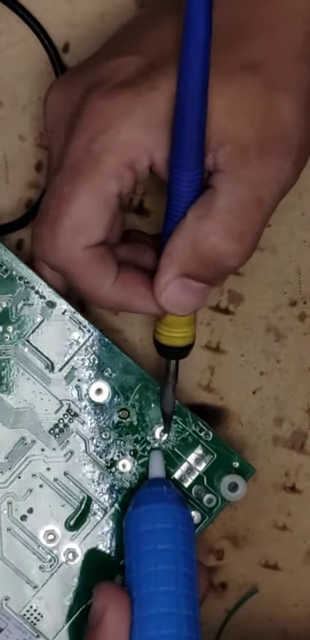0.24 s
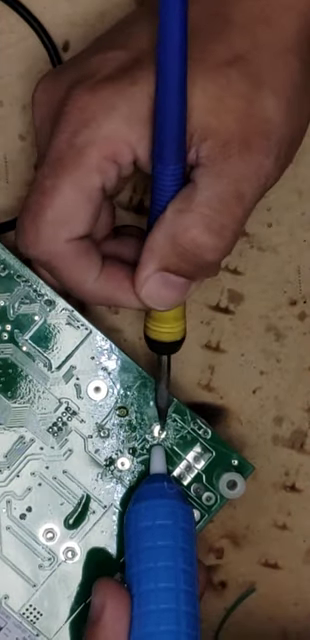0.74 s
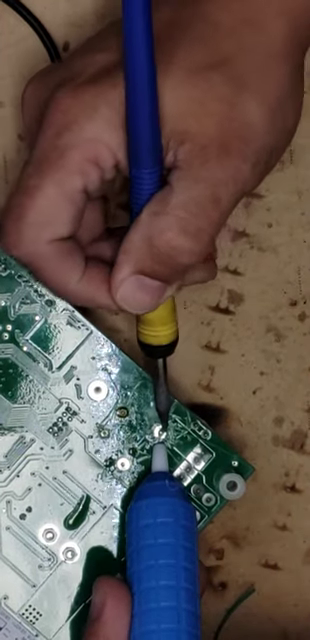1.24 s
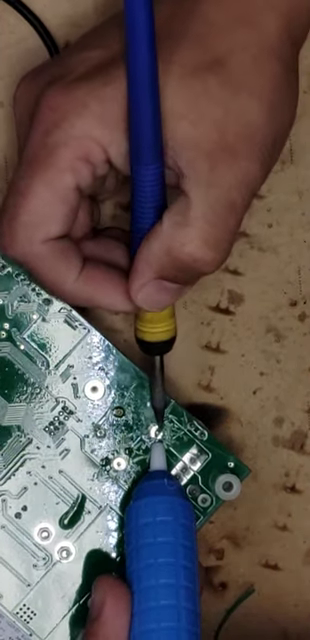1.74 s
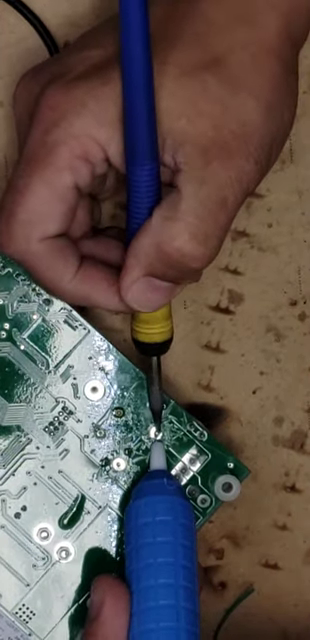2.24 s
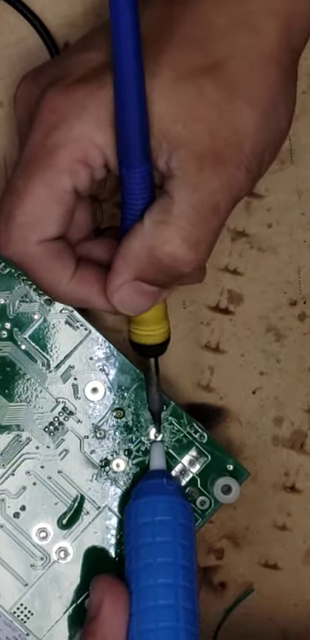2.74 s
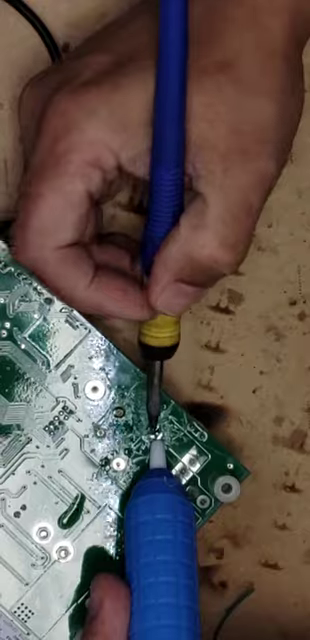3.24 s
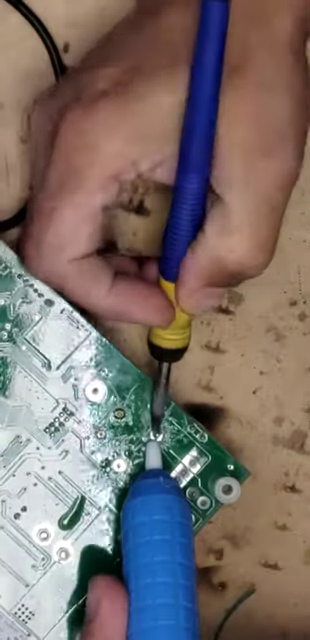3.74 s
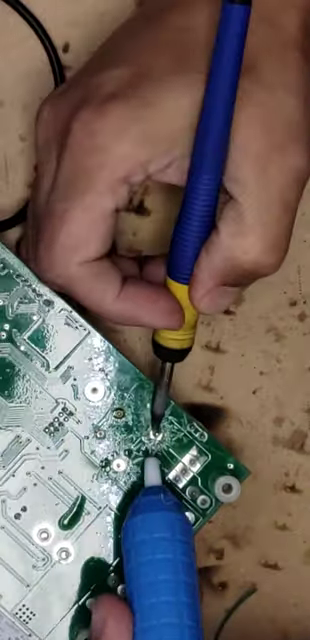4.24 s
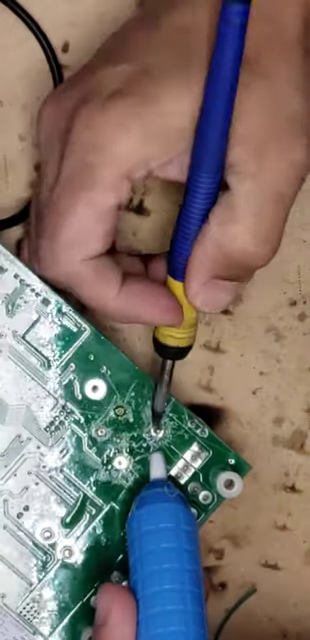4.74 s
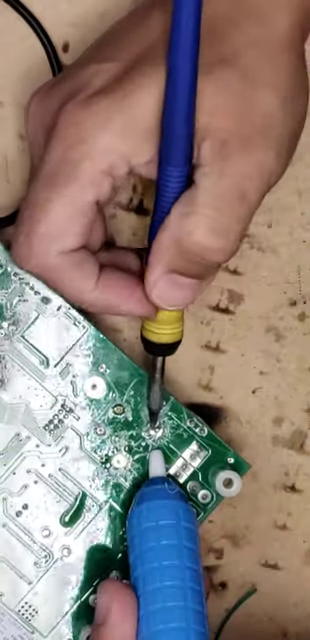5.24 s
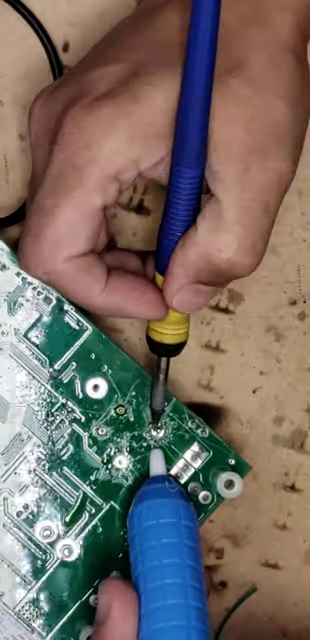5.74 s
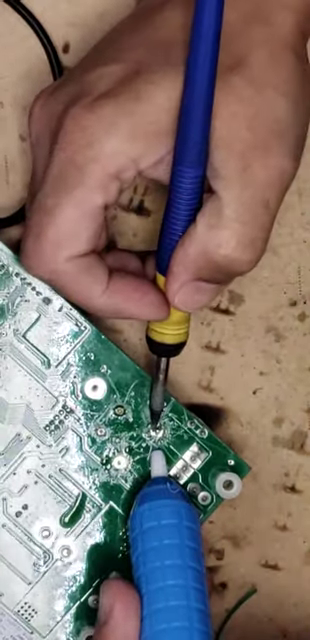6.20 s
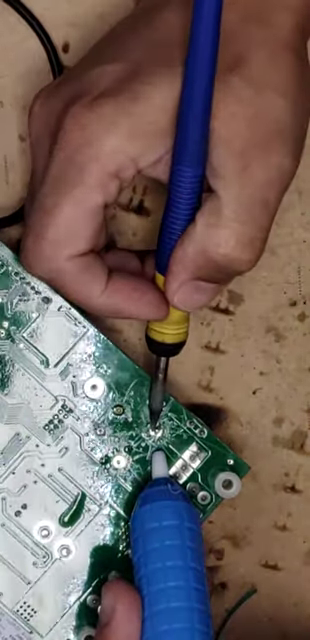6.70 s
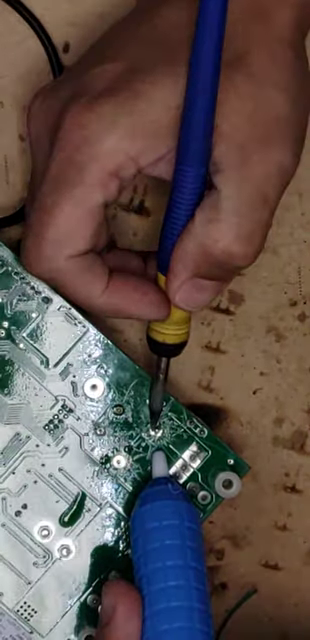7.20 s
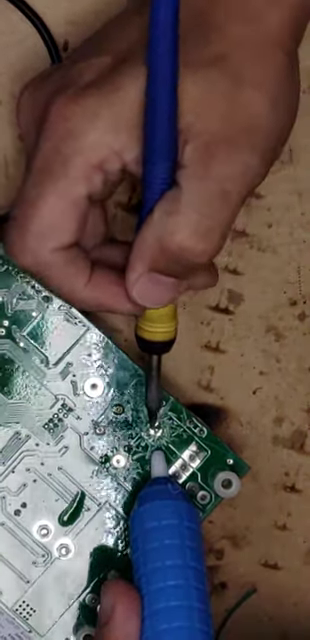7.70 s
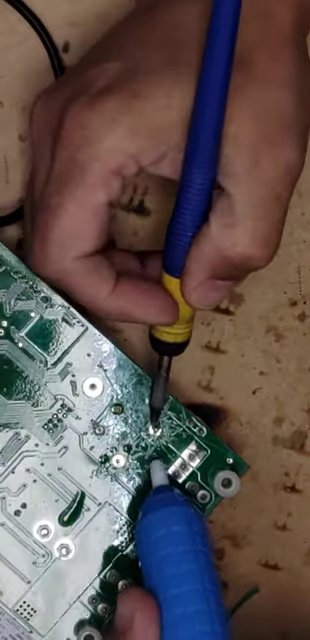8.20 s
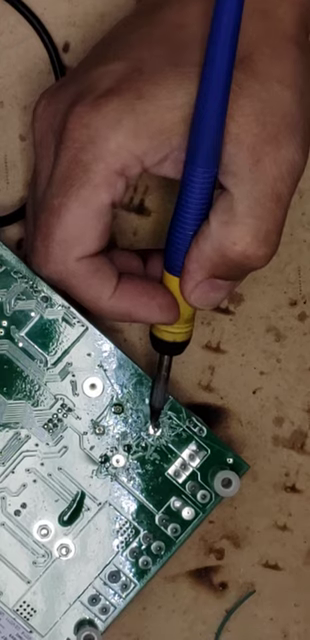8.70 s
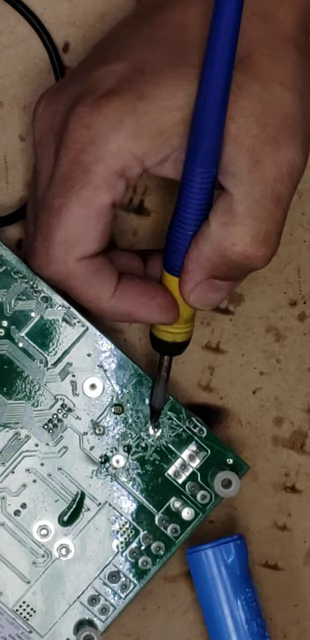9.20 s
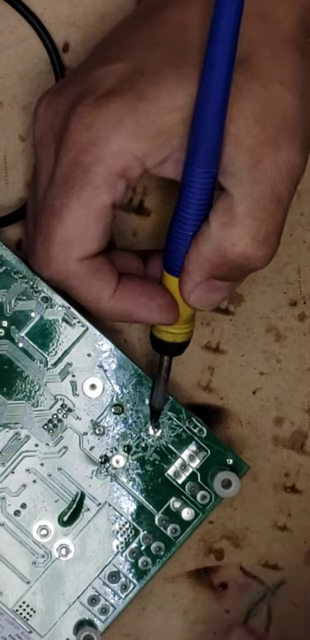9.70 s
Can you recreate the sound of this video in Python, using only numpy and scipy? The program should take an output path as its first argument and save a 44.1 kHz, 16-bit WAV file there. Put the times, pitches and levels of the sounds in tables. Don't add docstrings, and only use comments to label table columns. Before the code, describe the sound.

Steady low mains hum with airy hiss, tiny ticks and hand rustles; it cuts out abruptly, followed by scraping, clicking plastic and quiet room rumble.

```python
import sys
import numpy as np
from scipy import signal
from scipy.fft import rfft, irfft, next_fast_len
from scipy.io import wavfile

SR = 44100
rng = np.random.default_rng(int(sys.argv[2]) if len(sys.argv) > 2 else 0)


def to_wav(sig):
    pcm = np.clip(np.atleast_2d(sig), -1, 1) * 32767
    pcm = np.round(pcm).astype(np.int16)
    wavfile.write(sys.argv[1], SR, pcm.T)


def magnitude_from_level(level_db):
    exponent = np.asarray(level_db, float) / 20
    return 10 ** exponent


N = 438794

# start_s, mains_hz
MAINS = [(0, 59.995), (4, 60.0), (9.95, 60.014)]
# multiple, left_db, right_db, left_lead_rad
PUMP_PARTIALS = [(1, -53.3, -49.7, -.7), (2, -54.6, -53.2, .3),
                 (3, -50.4, -53.3, -0.1), (4, -42.0, -42.5, 0.1), (5, -59.1, -63.3, 0.1),
             (6, -63.4, -71.6, -0.4), (7, -70.7, -79.7, 0.7), (8, -75.9, -67.4, 0.1),
             (9, -67.5, -69.3, 1.0), (10, -76.9, -72.8, 0.2), (11, -68.3, -75.9, -0.9),
             (12, -81.6, -73.3, -2.4), (13, -63.2, -68.1, -0.2), (14, -67.3, -68.9, -1.9),
             (15, -56.6, -64.8, 0.0), (16, -62.8, -67.3, -0.3), (17, -62.8, -76.2, -1.2),
             (18, -68.7, -88.3, -1.4), (20, -73.0, -83.5, 1.4), (21, -77.7, -83.8, -1.0),
             (23, -73.9, -86.4, -2.7), (27, -76.2, -81.1, -1.1), (29, -74.8, -86.9, 0.8),
             (30, -67.9, -91.8, -0.6), (31, -71.1, -90.5, -2.6)]
# multiple, left_db, right_db
MOTOR = [(1, -49.3, -50.3), (2, -54.9, -54.3)]
MOTOR_SLIP_HZ, MOTOR_IN_STEP_S = 0.16, (3.25, 2.93)
OFF_S = 8.755
# pitch_hz, level_db
PANELS = [(430, -74), (545, -74), (665, -69)]
# frequency_hz, level_db (per Hz)
AIR_SPECTRUM = [(120, -46.5), (200, 3), (400, -4.5), (900, -2.5), (1400, -3), (2100, -3.5), (2350, -7.5),
                (3000, -5), (5500, -9), (7000, -16), (8100, -38), (9800, -41), (11500, -29.5), (15800, -26)]
# centre_hz, width_hz, left_db, right_db (negative values are dips)
CASING = [(1227, 62, 2.5, 8), (2030, 91, 4.5, 6), (2673, 70, 8.5, 4), (3207, 110, 6, -2.5),
          (3760, 550, -1, -0.5), (3946, 90, 4.5, 5.5), (3840, 190, -2.5, 3.5), (4400, 74, 4, -2.5),
          (4520, 490, -6, -0.5), (4530, 100, 7, 5.5), (5220, 180, -1, 13.5), (5320, 140, 3.5, -1),
          (6180, 160, 2.5, -5), (6580, 120, 5, -8), (7720, 990, 5.5, -10.5)]

# start_s, length_s, body_db, slide_above_body_db
STROKES = [
    (8.95, 0.056, -54.5, -5.5),
    (9.18, .015, -67, -7),
    (9.195, 0.07, -62.5, -11),
    (9.262, 0.068, -62, -9),
    (9.311, .018, -61, 5),
    (9.335, 0.023, -61.5, 3),
    (9.376, 0.042, -65, -10),
    (9.502, 0.02, -67, -8),
    (9.541, 0.016, -71, -8),
    (9.913, .06, -80, -8),
]
STROKE_RISE_S, STROKE_SAG_DB_PER_S, STROKE_T60_S = 0.0084, 74, 0.076
# start_s, length_s, treble_db, slide_above_treble_db
RUSTLE = [(3.877, 0.15, -63.5, -1), (4.463, .075, -73, -8), (4.529, .006, -73, -5), (5.676, .012, -68, -1),
          (6.3, 0.068, -85, 18), (8.47, 0.14, -76.5, 9), (8.604, 0.045, -67, 4.5), (8.665, .05, -74.5, 13),
          (8.74, .015, -65, 4), (9.194, 0.095, -64.5, -5.5), (9.31, .015, -65, -5), (9.797, .008, -83, -8)]
RUSTLE_RISE_SHARE, RUSTLE_SAG_DB_PER_S, RUSTLE_T60_S = 0.31, 16, 0.16
# frequency_hz, level_db (per Hz)
BODY_SPECTRUM = [(520, -21), (720, -2), (1000, -4), (1500, 1.5), (2000, -6), (2500, -2), (2900, -7),
                 (5000, -32)]
SLIDE_SPECTRUM = [(2000, -7), (3200, -0.5), (5000, 0), (7200, -4.5), (8200, -22), (9500, -42)]
RUSTLE_SPECTRUM = [(5000, -30.5), (8000, -13.5), (9500, -7.5), (11500, -0.5), (15800, -0.5)]
# start_s, peak_db, tone_centre_hz, chatter_s
HITS = [(8.957, -41.5, 950, .012), (8.959, -50, 2350, 0.018), (8.968, -42, 2350, .02),
        (8.975, -55, 1600, .03), (9.0, -54, 1900, .012), (9.180, -62, 1430, 0.023),
        (9.203, -49, 895, 0.019), (9.229, -54, 1490, 0.0063), (9.241, -51, 1300, 0.008),
        (9.268, -48.5, 1800, 0.0057), (9.276, -54, 2500, 0.0054), (9.322, -56, 3300, .008),
        (9.337, -40, 3900, 0.0021), (9.351, -44, 2400, .0025), (9.382, -48, 1480, .04),
        (9.518, -55, 2400, 0.025), (9.54, -58, 1450, 0.0055), (9.72, -76, 6600, .05),
        (9.797, -60, 7050, .028), (9.826, -71, 6900, .04), (9.889, -72, 5800, .03), (9.91, -71, 6800, .05),
        (9.916, -66, 1500, .02), (9.935, -60, 2600, .03)]
# pitch_hz, level_db, t60_s
BARREL_MODES = [(760, -2.5, 0.013), (960, -4, 0.043), (1334, -10, 0.032), (1430, -3, 0.044),
                (1650, 0, 0.048), (1900, -2.5, .025), (2230, -18, 0.023), (2424, -3.5, 0.019),
                (3170, -1, 0.018), (3440, 3, .015), (3880, -5, .015), (4520, 2, 0.018), (5270, 2, 0.012),
                (5360, -11, .015), (6240, 2, 0.022), (6800, -2.5, .015), (7500, -0.5, 0.0085)]
SPREAD_OCTAVE_S = 0.005
SPRING_HZ, SPRING_S, SPRING_DB = 2530, 9.36, -80
SPRING_RISE_S, SPRING_HOLD_S, SPRING_SAG_DB_PER_S, SPRING_T60_S = 0.04, 0.32, 18, 0.6
# start_s, peak_db, first_hz, last_hz, length_s
TICKS = [
    (.489, -46.5, 1850, 1200, .004),
    (2.24, -60.5, 1450, 2050, .11),
    (2.532, -47.5, 1900, 1250, .007),
    (3.045, -56, 640, 680, .035),
    (3.235, -57, 680, 630, .04),
    (3.9, -58, 1550, 1250, .055),
    (4.637, -45.5, 2000, 1250, .004),
]

# frequency_hz, level_db (per Hz)
ROOM_SPECTRUM = [(20, -13.5), (45, -3.5), (90, -7), (140, -11.5), (200, -20), (305, -14), (380, -26),
                 (450, -22), (620, -37), (1000, -45), (6500, -56.5), (8500, -67), (10500, -55),
                 (14000, -53)]
# time_s, level_db
ROOM_LEVEL = [(0, -51.5), (2, -51), (4, -49.5), (6, -51.5), (8, -51), (9.1, -52), (9.95, -51)]
# centre_hz, width_hz, left_db, right_db
BUILDING = [(77, 11, 5, 4), (299.8, 12, 6.6, 5), (6600, 650, 6, -5)]
WORKSHOP_T60_S = 0.19
# frequency_hz, level_db
LEFT_LOUDER = [(60, -4), (110, 0), (200, -6), (380, 2), (700, 7), (1290, 5.5), (2380, 7), (4400, 8.5),
               (8120, 14), (15000, 8)]
# frequency_hz, likeness (0-1)
LIKENESS = [(60, 0.93), (300, 0.92), (640, 0.64), (1400, 0.31), (5000, 0.48), (9000, 0.02), (15000, 0)]
# frequency_hz, lead_rad
LEFT_LEAD = [(0, 0), (950, -0.2), (1290, -2.1), (1980, -8.8), (3270, -10.3), (3530, -9.3), (4130, -16.2),
             (4390, -18.0), (5170, -16.6), (6550, -14.5), (9560, -20.3), (12100, -19.6), (14000, -37.2),
             (15400, -35.3)]


def hum(mains):
    waver = 0.005 * np.array([drift(3), drift(4), drift(5)])
    pump = 0
    for k, left_db, right_db, lead in PUMP_PARTIALS:
        partial = tone(k * mains + stroke_phase(k), left_db, right_db, lead)
        pump = pump + partial * (1 + k * waver[int(k) % len(waver)])
    motor = 0
    for (k, left_db, right_db), in_step_s in zip(MOTOR, MOTOR_IN_STEP_S):
        slip = 2 * np.pi * k * MOTOR_SLIP_HZ * (np.arange(N) / SR - in_step_s)
        motor = motor + tone(k * mains + stroke_phase(k) - slip, left_db, right_db, 0)
    return pump * after_off(0.06) + motor * magnitude_from_level(1.4 * drift(2.3))


def stroke_phase(k):
    if k < 8:
        return 2.05 * k - 1.7 - (k == 1) * np.pi / 2
    return 2.07 + 1.66 * k + (k % 2 == 0) * np.pi / 3


def air(mains):
    stroke = 1 + 0.046 * np.cos(mains) + 0.061 * np.cos(2 * mains)
    hiss = coloured(AIR_SPECTRUM, CASING)
    hiss = hiss + magnitude_from_level(-11) * echoes(hiss, 0.07)
    return magnitude_from_level(-57.5 + 0.65 * drift(5.3)) * stroke * after_off(0.19) * hiss


def shudder():
    since = np.arange(N) / SR - OFF_S
    swing = np.interp(since, [-0.004, 0.006, 0.036, 0.052], [0, 1, 0.7, 0])
    turn = 2 * np.pi * 122 * since
    return magnitude_from_level(-37) * swing * (0.3 * np.sin(2.1 * turn) - np.sin(turn + 0.9))


def rattle():
    panels = 0
    for hz, level_db in PANELS:
        bursts = magnitude_from_level(level_db + 3.8 * drift(8.1))
        panels = panels + bursts * rms_one(ring(rng.standard_normal(N), hz, 0.087))
    return panels * after_off(0.58) * magnitude_from_level(np.array([[0.0], [-4.0]]))


def handling():
    s, length, body_db, above_db = np.transpose(STROKES)
    shape = STROKE_RISE_S, STROKE_SAG_DB_PER_S, STROKE_T60_S
    body = strokes(s, length, body_db, *shape)
    slide = strokes(s, length, body_db + above_db, *shape)
    treble = slide * magnitude_from_level(-9.5)

    s, length, rustle_db, above_db = np.transpose(RUSTLE)
    shape = RUSTLE_RISE_SHARE * length, RUSTLE_SAG_DB_PER_S, RUSTLE_T60_S
    rustle = strokes(s, length, rustle_db, *shape)
    brush = strokes(s, length, rustle_db + above_db, *shape)

    flutter = magnitude_from_level(-3.0 + 2.0 * drift(25))
    dull = flutter * body * coloured(BODY_SPECTRUM, grainy_db=4.0)
    sliding = (flutter * slide + brush) * coloured(SLIDE_SPECTRUM, grainy_db=3.0)
    bright = (treble + rustle) * coloured(RUSTLE_SPECTRUM, grainy_db=2.5)
    return dull + sliding + bright


def hits():
    t = np.arange(SR // 8) / SR
    out = np.zeros((2, N + len(t)))
    for s, peak_db, tone_hz, chatter_s in HITS:
        spread = min(SPREAD_OCTAVE_S / chatter_s, 1.25)
        chance = rng.normal(0, 1, (len(BARREL_MODES), 2, 1))
        chatter = rng.standard_normal((len(BARREL_MODES), len(t))) * magnitude_from_level(-60 * t / (3 * chatter_s))
        for k, (hz, level_db, t60) in enumerate(BARREL_MODES):
            off_tone_db = 6 * (np.log2(hz / tone_hz) / max(spread, 0.1)) ** 2
            lean_db = at_hz(LEFT_LOUDER, hz) * np.array([[0.5], [-0.5]])
            strength = magnitude_from_level(peak_db + level_db - 4 - off_tone_db + lean_db + 1.5 * chance[k])
            rung = ring(chatter[k], hz, t60)
            out[:, round(s * SR):][:, :len(t)] += strength * rung / np.abs(rung).max()
    return out[:, :N]


def spring():
    tremble = ring(rng.standard_normal((2, N)), SPRING_HZ, 0.035)
    swing = strokes([SPRING_S], [SPRING_HOLD_S], [SPRING_DB], SPRING_RISE_S, SPRING_SAG_DB_PER_S, SPRING_T60_S)
    return swing * rms_one(tremble)


def ticks():
    out = np.zeros(N)
    for s, peak_db, first_hz, last_hz, length in TICKS:
        size = round(length * SR)
        turn = 2 * np.pi * np.cumsum(np.linspace(first_hz, last_hz, size)) / SR
        swell = np.hanning(size + 2)[1:-1] ** 0.5
        out[round(s * SR):][:size] += magnitude_from_level(peak_db) * swell * np.sin(turn)
    return out * magnitude_from_level(np.array([[2.5], [-3.5]]))


def room_tone():
    level_db = in_time(ROOM_LEVEL) + 0.9 * drift(0.98)
    return magnitude_from_level(level_db) * coloured(ROOM_SPECTRUM, BUILDING, lean=0.18)


def echoes(x, t60):
    t = np.arange(SR // 2) / SR
    tail = rng.standard_normal((2, len(t))) * magnitude_from_level(-60 * t / t60) * (t > 0.001)
    tail = tail / np.sqrt((tail ** 2).sum(axis=1, keepdims=True))
    return signal.fftconvolve(x, tail, axes=1)[:, :N]


def coloured(spectrum, peaks=(), grainy_db=0, lean=1):
    size = next_fast_len(N)
    hz = np.maximum(np.arange(size // 2 + 1) * SR / size, 1)
    grain_sizes = magnitude_from_level(grainy_db * np.minimum(rng.exponential(1, N), 6))
    shared, left, right = rfft(rng.standard_normal((3, N)) * grain_sizes, size)
    alike = np.clip(at_hz(LIKENESS, hz), 0, 1)
    led = shared * np.exp(1j * np.interp(hz, *np.transpose(LEFT_LEAD)))
    db = at_hz(spectrum, hz) + lean * at_hz(LEFT_LOUDER, hz) * np.array([[0.5], [-0.5]])
    for centre_hz, width_hz, *side_db in peaks:
        db += np.array(side_db)[:, None] / (1 + (2 * (hz - centre_hz) / width_hz) ** 2)
    pair = np.sqrt(alike) * np.array([led, shared]) + np.sqrt(1 - alike) * np.array([left, right])
    out = irfft(magnitude_from_level(db) * pair, size)[:, :N]
    return out / np.sqrt(np.mean(out.mean(axis=0) ** 2))


def strokes(starts, lengths, dbs, rise_s, sag_db_per_s, t60):
    out, t = np.zeros(N), np.arange(SR) / SR
    for s, length, db, rising_s in np.broadcast(starts, lengths, dbs, rise_s):
        rise = np.minimum(t / max(rising_s, 0.001), 1) ** 2
        fall_db = sag_db_per_s * np.minimum(t, length) + 60 * np.maximum(t - length, 0) / t60
        out[round(s * SR):][:SR] += (rise * magnitude_from_level(db - fall_db))[:N - round(s * SR)]
    return out


def ring(clicks, hz, t60):
    r, w = magnitude_from_level(-60 / (t60 * SR)), 2 * np.pi * hz / SR
    return signal.lfilter([0, np.sin(w)], [1, -2 * r * np.cos(w), r * r], clicks + 1e-18)


def tone(turn, left_db, right_db, lead):
    level = np.sqrt(2) * magnitude_from_level(np.array([[left_db], [right_db]]))
    return level * np.cos(turn + lead * np.array([[0.5], [-0.5]]))


def after_off(t60):
    return magnitude_from_level(-60 * np.maximum(np.arange(N) / SR - OFF_S, 0) / t60)


def drift(rate):
    steps = rng.standard_normal(int(N / SR * 60) + 200)
    r = np.exp(-2 * np.pi * rate / 60)
    slow = signal.lfilter([1], [1, -2 * r, r * r], steps)[198:]
    return np.interp(np.arange(N) / SR * 60, np.arange(len(slow)), rms_one(slow))


def rms_one(x):
    return x / np.sqrt(np.mean(x ** 2) + 1e-20)


def in_time(rows):
    s, *columns = np.transpose(rows)
    return np.array([np.interp(np.arange(N) / SR, s, c) for c in columns])


def at_hz(points, hz):
    point_hz, values = np.array(points).T
    return np.interp(np.log(hz), np.log(point_hz), values)


def scene():
    mains = 2 * np.pi * np.cumsum(in_time(MAINS)[0]) / SR
    hands = handling() + hits() + spring() + ticks()
    pump = hum(mains) + air(mains) + shudder()
    return pump + room_tone() + hands + magnitude_from_level(-6.0) * echoes(hands, WORKSHOP_T60_S) + rattle()


def top_cut(x):
    return signal.sosfilt(signal.butter(12, 15890, fs=SR, output="sos"), x)


def record(dry):
    cut = signal.ellip(12, 0.05, 60, 15700, fs=SR, output="sos")
    mix = signal.sosfilt(cut, dry)
    return top_cut(mix)


dry = scene()
out = record(dry)
to_wav(out)
```